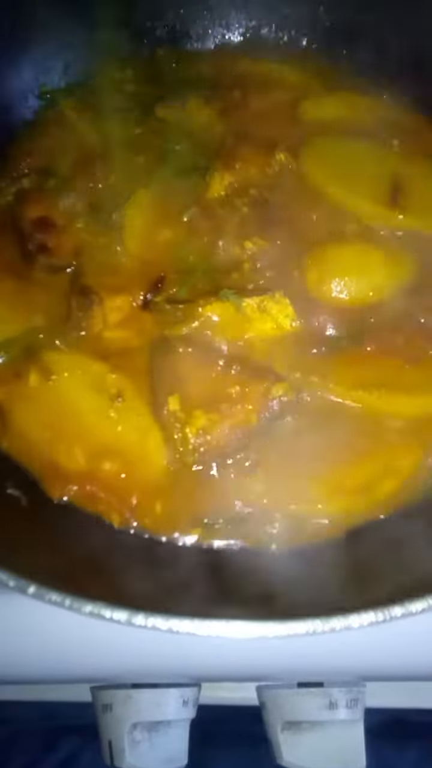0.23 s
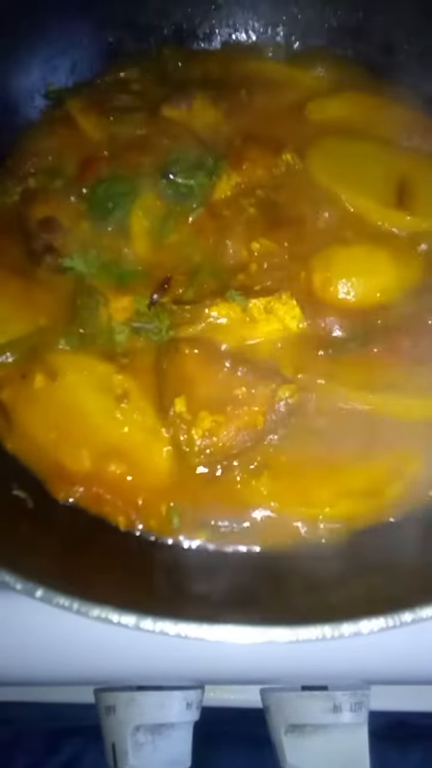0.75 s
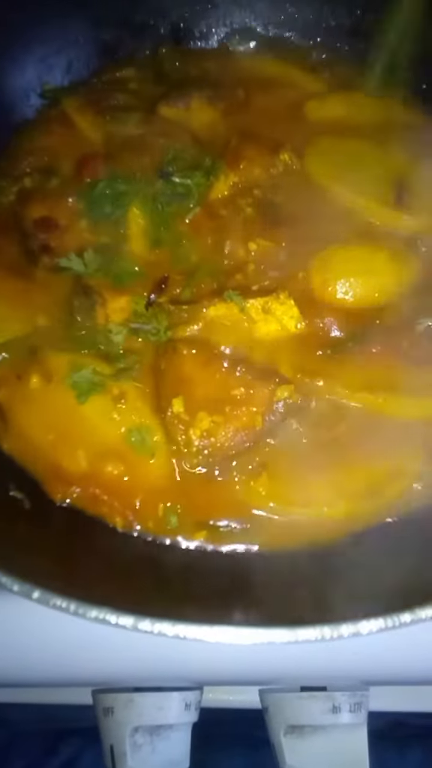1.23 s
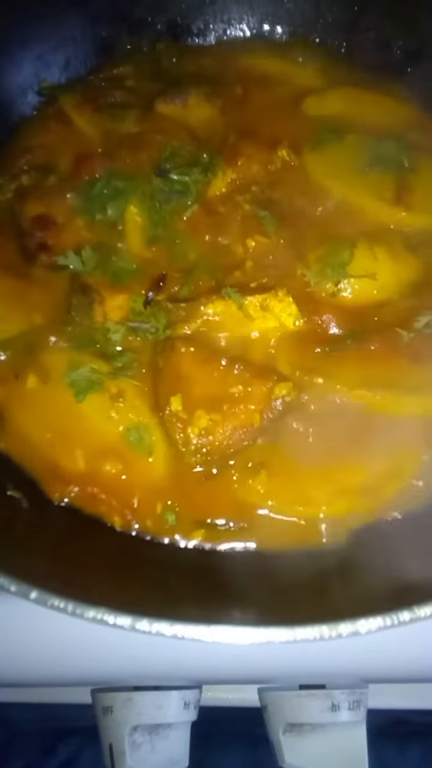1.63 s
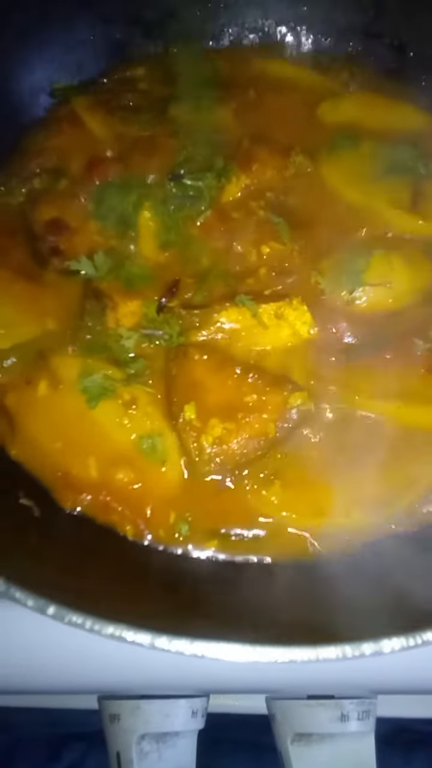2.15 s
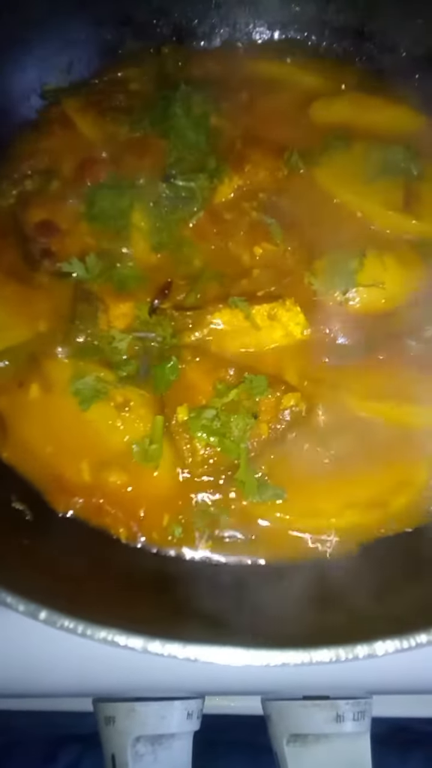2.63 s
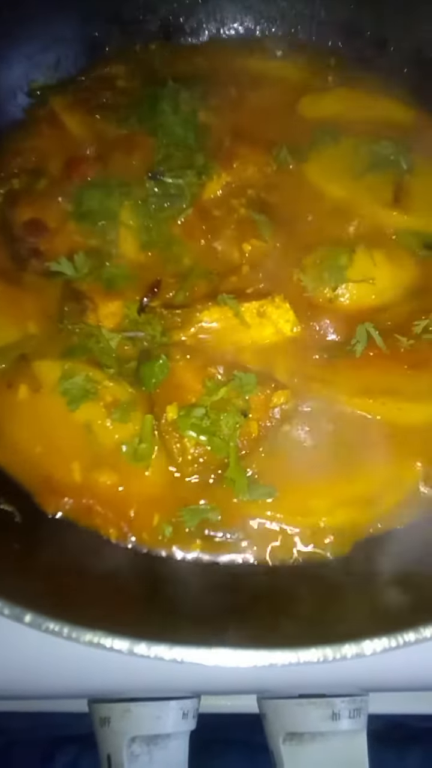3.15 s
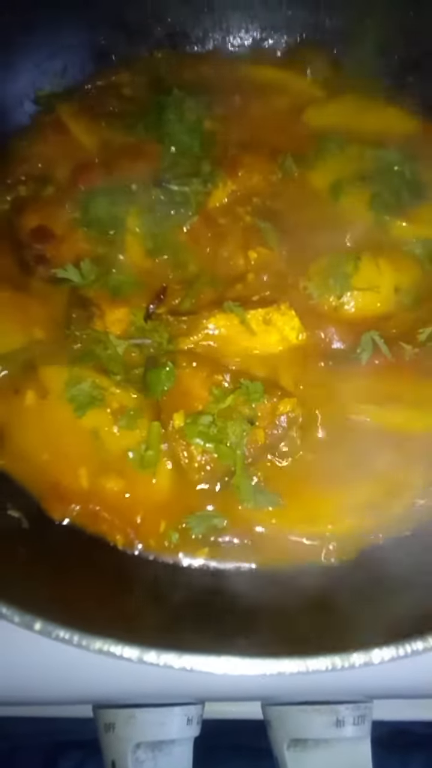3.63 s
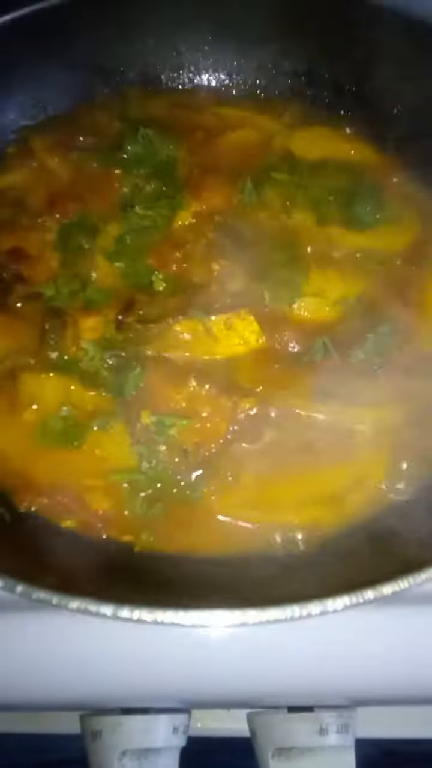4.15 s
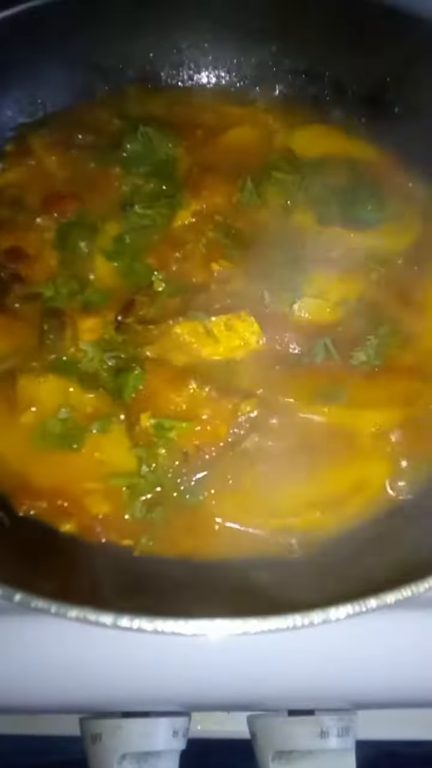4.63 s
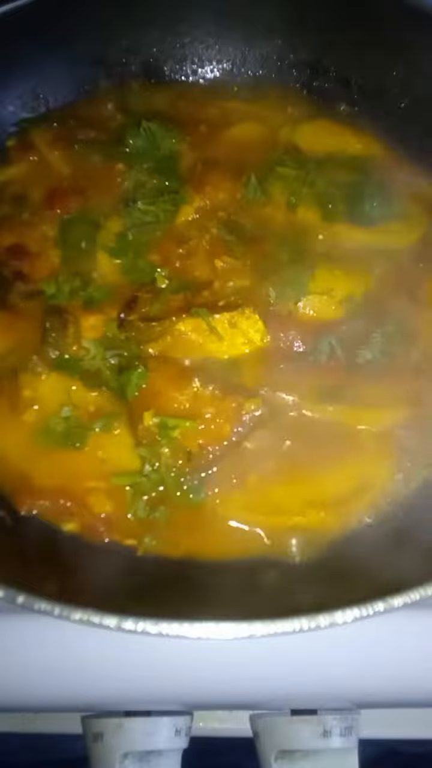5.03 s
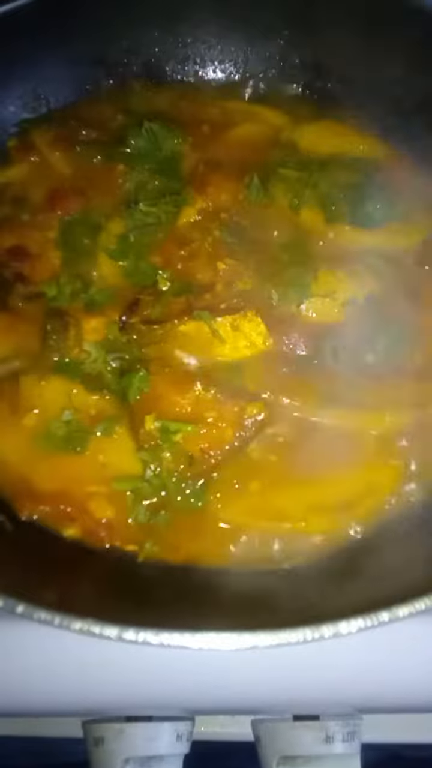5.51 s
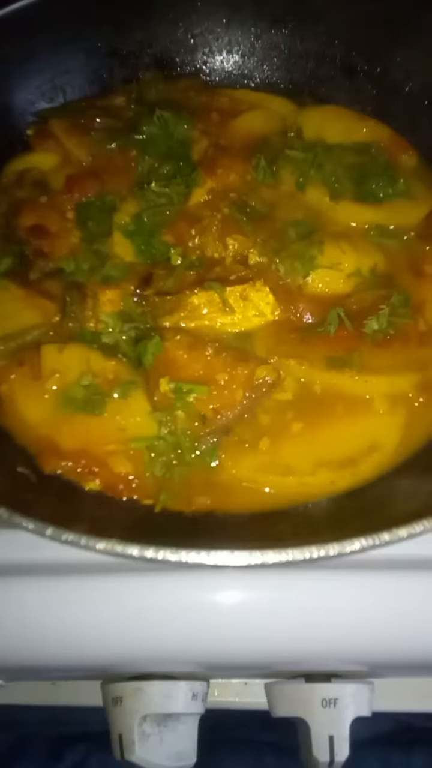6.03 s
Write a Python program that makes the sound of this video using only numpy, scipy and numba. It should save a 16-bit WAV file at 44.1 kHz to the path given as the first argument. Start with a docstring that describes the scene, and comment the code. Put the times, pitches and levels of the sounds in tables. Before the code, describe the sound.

Thick curry bubbles and sputters wetly in a pan up close, with sharp pops and spits, brief knocks and cut-outs, then a quiet kitchen.

```python
"""A thick curry simmers in a wide pan near a hand-held phone, over low rumble, faint kitchen noise and hiss.
From the start, swarms of damped sines make bubbles of four sizes; louder sines with spits of noise make pops.
Steam sputters, noise cracks followed by narrow strings of sines, join in; later fingers knock the phone.
At about 4.1 s the sound cuts out and fades back from a new position, with other resonances; at about 5.8 s,
just after further knocks, it cuts out again and fades back over the quiet kitchen alone."""
import sys
import numpy as np
from scipy import signal
from scipy.fft import rfft, irfft
from scipy.io import wavfile
from scipy.ndimage import uniform_filter1d
from numba import njit

SR = 44100
rng = np.random.default_rng(int(sys.argv[2]) if len(sys.argv) > 2 else 0)


def int16_out(signal):
    """Quantize to a 16-bit WAV file."""
    q = np.round(np.clip(np.atleast_2d(signal).T, -1, 1) * 32767)
    wavfile.write(sys.argv[1], SR, q.astype(np.int16))


def gain_from_decibels(decibels):
    """Convert decibel values to linear amplitude factors."""
    exponent = np.asarray(decibels, float) / 20
    return 10 ** exponent


N = 276930
TIME = np.arange(N) / SR


def level(x, db):
    """Root-mean-square normalisation: scale a signal to an rms level in dB."""
    return x * gain_from_decibels(db) / np.sqrt(np.mean(x ** 2))


def response(points, peaks=()):
    """Transfer magnitude: a curve through (Hz, dB) points times resonance peaks (Hz, width Hz, lift dB)."""
    hz = np.maximum(np.fft.rfftfreq(N, 1 / SR), 1)
    point_hz, point_db = np.transpose(points)
    gain = gain_from_decibels(np.interp(np.log(hz), np.log(point_hz), point_db))
    for centre, width, lift_db in peaks:
        detuning = 2 * (hz - centre) / width
        gain = gain * (1 + (gain_from_decibels(lift_db) - 1) / (1 + detuning ** 2))
    return gain


def causal(x, gain):
    """Minimum-phase filtering: the folded cepstrum lets resonances ring only after their excitation."""
    cepstrum = irfft(np.log(gain), N)
    cepstrum[1:N // 2] *= 2
    cepstrum[N // 2 + 1:] = 0
    return irfft(rfft(x) * np.exp(rfft(cepstrum)), N)


def noise(points):
    """Spectral shaping: steady white noise filtered to a given colour."""
    return irfft(rfft(rng.standard_normal(N)) * response(points), N)


def walk(rate):
    """Slow random modulation: normal levels drawn `rate` times a second, joined by straight ramps."""
    hold = int(SR / rate)
    steps = np.repeat(rng.standard_normal(400), hold)[:N]
    return 1.046 * uniform_filter1d(steps, hold)


def swells(centre, width, change_db):
    """Gaussian modulation: a sum of bell-shaped level changes in dB, each with its full width at 1/e."""
    return sum(db * np.exp(-4 * ((TIME - at) / wide) ** 2)
               for at, wide, db in zip(centre, width, change_db))


def puffs(s, db, t60, rise):
    """Impulse excitation of an envelope: gusts rise with time constant `rise` in s and decay exponentially."""
    trigger = np.zeros(N)
    np.add.at(trigger, (s * SR).astype(int), gain_from_decibels(db))
    age = TIME[:SR // 8]
    return signal.fftconvolve(trigger, (1 - np.exp(-age / rise)) * 1000. ** (-age / t60))[:N]


@njit
def rings(start, hz, t60, size, glide, rise, length):
    """Damped free oscillation: sines swell over the share `rise` of their life, then decay; pitch glides."""
    out = np.zeros(length)
    for k in range(len(start)):
        life = int(t60[k] * SR)
        phase = 0.
        for i in range(min(life, length - start[k])):
            age = i / life
            phase += 2 * np.pi * hz[k] * (1 + glide * age) / SR
            swell = np.sin(np.pi / 2 * min(age / rise, 1.)) ** 2
            decay = 1000. ** -max(age - rise, 0.)
            out[start[k] + i] += size[k] * swell * decay * np.sin(phase)
    return out


def ring_rows(rows, glide, rise):
    """Superposition of damped oscillations, from rows of (start s, Hz, T60 s, amplitude)."""
    s, hz, t60, size = (np.ascontiguousarray(c) for c in np.transpose(rows))
    return rings((s * SR).astype(np.int64), hz, t60, size, glide, rise, N)


# Broad colour under the resonances. Each row: frequency in Hz, gain in dB.
PAN_COLOUR = [(150, -8.5), (300, -1), (600, 3.5), (1000, -3), (1500, -11), (2200, -7.5), (3500, -15.5),
              (5500, -25.5), (6800, -29), (8000, -38.5), (10000, -64)]
# Resonances between pan and microphone, one table a position.
# Each row: centre in Hz, width in Hz, lift in dB.
POSITION_RESONANCES = [
    [(530, 95, 11.5), (704, 30, 5.5), (1030, 470, 4.5), (2490, 380, 22.5), (3195, 130, 11),
     (3750, 160, 5.5), (4550, 140, 12), (5380, 220, 3.5), (6580, 100, 7.5)],
    [(525, 65, 12.5), (720, 120, 5.5), (1100, 360, 9.5), (2136, 320, 17), (2640, 88, 7.5),
     (3700, 260, 14.5), (4450, 230, 10.5), (4900, 200, -3), (6450, 400, 0.5)],
]


def heard(x):
    """Resonant transmission: through the modes of the first position, then of the second."""
    move_s = 4.09
    first, second = (causal(x, response(PAN_COLOUR, peaks)) for peaks in POSITION_RESONANCES)
    return np.where(TIME < move_s, first, second)


def walls(x):
    """Diffuse reverberation: a short decaying noise tail from pan wall, hob and tiles."""
    t60_s, tail_db = 0.082, -7
    age = TIME[:SR // 4]
    tail = rng.standard_normal(len(age)) * 1000. ** (-age / t60_s) * (age > .003)
    return x + gain_from_decibels(tail_db) * signal.fftconvolve(x, tail / np.linalg.norm(tail))[:N]


# Kitchen background colour. Each row: frequency in Hz, relative density in dB per Hz.
KITCHEN_COLOUR = [(30, -25), (80, -9.5), (125, -7.5), (230, -12), (850, -15), (1400, -23.5), (2500, -29),
                  (6500, -32.5), (8000, -53.5), (12000, -73.5)]


def kitchen():
    """Stationary background noise: a steady, mostly low spectrum."""
    return level(noise(KITCHEN_COLOUR), -73.5)


# Microphone hiss colour. Each row: frequency in Hz, relative density in dB per Hz.
HISS_COLOUR = [(3000, -9.5), (8000, -4), (13600, -9), (14700, 1), (15700, 0), (15900, -39)]


def hiss():
    """Microphone self-noise: a steady high-frequency spectrum."""
    return level(noise(HISS_COLOUR), -92.5)


# Burner and hand rumble colour. Each row: frequency in Hz, relative density in dB per Hz.
RUMBLE_COLOUR = [(20, -8), (45, -2.5), (100, -0.5), (170, -3), (280, -1), (400, -27), (700, -77)]
# The hand shifts on the phone. Each row: centre in seconds, full width in seconds, rumble lift in dB.
HAND_SHIFTS = [(.5, 0.97, 8), (1.126, .15, 5.5), (1.383, .1, 3.5), (1.541, 0.087, 16), (1.7, 0.073, 12),
               (1.893, 0.041, 1), (2.123, .08, 5.5), (2.4, 0.24, 5), (3.55, .07, 3), (3.819, 0.033, 15.5),
               (3.872, 0.045, 16), (3.958, 0.071, 14), (4.4, 0.19, 5), (4.797, .14, 12),
               (5.275, 0.047, 9.5), (5.667, 0.079, 10)]


def rumble():
    """Amplitude-modulated low-frequency noise: burner and hand, swelling as the grip shifts."""
    mean_db, wander_db, wander_per_s = -76.5, 3.5, 9
    db = mean_db + swells(*np.transpose(HAND_SHIFTS)) + wander_db * walk(wander_per_s)
    return level(noise(RUMBLE_COLOUR), 0) * gain_from_decibels(db)


def swarm(low_hz, high_hz, rate, cycles, spread_db, fizz_db):
    """Random bubble resonance: scattered bursts, a few much larger, over the fizz of uncountable ones."""
    when, pitch, big, sign = rng.random((4, 8000))
    keep = np.arange(8000) < rate * N / SR
    hz = low_hz + (high_hz - low_hz) * pitch
    spread = gain_from_decibels(-spread_db * np.log(1 - .98 * big))
    size = keep * np.sign(sign - .5) * spread * np.sqrt(hz / low_hz)
    # the pitch rises as the cavity shrinks
    bursts = ring_rows(np.transpose([when * N / SR, hz, 3 * cycles / hz, size]), glide=0.092, rise=.2)
    fizz = noise([(low_hz / 1.2, -40), (low_hz, 0), (high_hz, 0), (high_hz * 1.15, -40)])
    return level(bursts, 0) + level(fizz, fizz_db)


def blisters():
    """Impulsive modulation: the sauce skin tears at random; for a moment every swarm bursts harder."""
    per_s, mean_db, spread_db = 30, -1, 6
    when, big = rng.random((400, 2))[:int(per_s * N / SR)].T
    gusts = puffs(when * N / SR, mean_db + spread_db * (big - .5), t60=.08, rise=.003)
    return level(1 + gusts, 0)


# Slow strength of the boil. Each row: time in seconds, relative level in dB, treble control in dB.
BOIL_STRENGTH = [(0, -63, -0.5), (.21, -62.5, -5), (.4, -59.5, 1.5), (.92, -66.5, 0.5), (1.2, -59, -2),
                 (1.62, -61, -1), (2.1, -60, -2.5), (2.55, -62.5, 3), (2.92, -60, 0.5), (3.4, -60.5, -3),
                 (3.75, -59.5, -1), (4.03, -62, -10), (4.13, -68, 2), (4.3, -62.5, 2), (4.55, -61.5, 1),
                 (4.95, -62, 5.5), (5.17, -68, 1.5), (5.36, -64.5, 1), (5.75, -61.5, 2.5)]
# Heaves of the sauce, which alter all swarms. Each row: centre in seconds, full width in seconds,
# level change in dB, tilt in dB from one swarm to the next finer.
SAUCE_HEAVES = [(.005, 0.043, 14, -6.5), (0.15, 0.057, 1, 3), (0.303, 0.13, 4.5, 2.5),
                (0.494, 0.049, 4, -0.5), (0.533, 0.067, 2, -3), (0.641, 0.041, 3.5, -4),
                (0.704, 0.24, 8.5, -1.5), (0.877, 0.024, 9, 0.5), (0.987, 0.05, 10.5, -1.5),
                (1.076, 0.083, 9.5, -4), (1.22, 0.069, 5, 0), (1.34, 0.036, -5.5, 3.5),
                (1.499, 0.063, 7, 0), (1.774, 0.065, 7.5, 0.5), (2, .09, 11.5, -1),
                (2.183, 0.15, 5.5, -1.5), (2.291, 0.083, 7.5, 0), (2.442, 0.069, 0, 4),
                (2.594, 0.068, 6.5, 0), (2.661, 0.055, 12.5, -4.5), (2.858, 0.043, 5.5, -1.5),
                (2.99, 0.046, 0.5, 1), (3.172, 0.12, 2.5, 0), (3.307, 0.041, 4.5, -2),
                (3.543, 0.029, 12.5, -1.5), (3.612, 0.087, 6, 0), (3.798, 0.088, 0.5, 2.5),
                (3.931, 0.065, 8, 3.5), (4.016, 0.072, 7, 3), (4.401, 0.095, 7.5, -1),
                (4.636, 0.097, 7, -3), (4.763, 0.067, 9, -2.5), (4.831, 0.037, 6.5, -2),
                (5.09, 0.13, 4, 0.5), (5.28, 0.13, 8.5, -1), (5.458, 0.029, -5.5, 4.5)]
# Bubble swarms, coarse to fine. Each row: lowest starting pitch in Hz, highest in Hz, bursts per second,
# cycles per 20 dB of decay, size spread in dB, fizz against the bursts in dB.
BUBBLE_SWARMS = [(253.8, 778, 340, 4.68, 2.0, -5), (776, 1722, 320, 8.0, 2.5, -6),
                 (1578, 3430, 900, 11.7, 3, -12.5), (3424, 7200, 930, 14, 3, -10)]
# Level of each swarm against the boil, in dB.
SWARM_LEVELS = [0, -7.5, -4, -13]
# Share of the treble control that each swarm follows, without unit.
SWARM_TREBLE_SHARES = [0, .4, 1, 1.1]


def boil():
    """Collective bubble noise: swarms share the boil and its heaves; each also wanders alone."""
    wander_db, wander_per_s = 2.5, 14
    s, boil_db, treble_db = np.transpose(BOIL_STRENGTH)
    centre, width, change_db, tilt_db = np.transpose(SAUCE_HEAVES)
    swarms = 0
    for k, row in enumerate(BUBBLE_SWARMS):
        db = np.interp(TIME, s, boil_db + SWARM_LEVELS[k] + SWARM_TREBLE_SHARES[k] * treble_db)
        db = db + swells(centre, width, change_db + k * tilt_db)
        db = db + wander_db * walk(wander_per_s)
        swarms = swarms + level(heard(swarm(*row)), 0) * gain_from_decibels(db)
    return swarms * blisters()


# Loud single bursts. Each row: time of the spit in seconds, relative ring level in dB,
# starting pitch in Hz, nominal T60 in seconds.
LOUD_POPS = [(.002, -39, 2470, 0.014), (0.1285, -44, 3900, 0.015), (.129, -44, 534, 0.044),
             (0.2906, -42, 2610, 0.011), (.344, -45, 545, 0.019), (.38, -40.5, 525, 0.037),
             (.465, -43.5, 830, 0.0084), (.4868, -43, 2490, 0.012), (0.49, -46.5, 3850, 0.022),
             (.5172, -42, 2320, .012), (0.537, -41, 2430, 0.0093), (0.595, -51.5, 522, 0.024),
             (.681, -43, 500, 0.011), (.6968, -44, 2940, 0.014), (0.7095, -38, 2296, 0.01),
             (0.8553, -47.5, 2560, 0.016), (0.9646, -34, 2430, 0.0092), (0.974, -40, 2570, .008),
             (1.0408, -37, 2340, 0.0073), (1.062, -35, 953, 0.014), (1.086, -50.5, 1014, 0.05),
             (1.119, -46, 2420, 0.01), (1.1746, -36, 2680, 0.0039), (1.2045, -37, 2570, 0.0036),
             (1.2444, -39.5, 2550, .0083), (1.3055, -35.5, 2310, 0.011), (1.3429, -36.5, 2800, 0.0028),
             (1.375, -42, 2580, 0.0085), (1.4437, -39.5, 2450, 0.0079), (1.5267, -40, 2210, 0.013),
             (1.658, -43, 523, 0.024), (1.6699, -43, 2640, 0.013), (1.728, -44.5, 2540, 0.012),
             (1.789, -39.5, 744, 0.021), (1.789, -38.5, 2160, 0.011), (1.916, -33, 2490, 0.011),
             (1.935, -46.5, 543, .053), (1.984, -45, 556, 0.031), (1.986, -44, 1160, .015),
             (2.1592, -47.5, 3110, 0.0047), (2.177, -45, 688, 0.033), (2.1789, -35, 2494, 0.014),
             (2.2116, -43.5, 3140, 0.013), (2.2497, -40, 3860, 0.0092), (2.2804, -34.5, 2490, 0.0093),
             (2.345, -44.5, 465, 0.032), (2.3461, -45, 2220, 0.012), (2.4199, -56, 2400, .012),
             (2.6838, -42, 2550, 0.019), (2.7, -50, 3900, 0.013), (2.717, -44, 3230, .01),
             (2.816, -47.5, 713, .035), (2.8157, -46, 2650, 0.013), (2.834, -48, 2750, 0.0049),
             (2.8475, -38.5, 2490, 0.0086), (2.968, -44, 2440, .0085), (3.1823, -38, 2580, 0.006),
             (3.194, -47, 680, 0.023), (3.196, -40.5, 2500, 0.0067), (3.258, -50, 3120, 0.014),
             (3.322, -47.5, 2460, 0.02), (3.435, -44.5, 2170, 0.01), (3.4671, -32.5, 2550, 0.004),
             (3.5289, -43.5, 2640, 0.012), (3.532, -41, 525, 0.01), (3.5997, -38, 2470, 0.012),
             (3.846, -43.5, 904, .025), (3.9257, -45, 2440, 0.016), (4.0497, -38.5, 2440, 0.0092),
             (4.4026, -43, 2154, .014), (4.4582, -42, 1990, 0.0073), (4.4789, -42.5, 2120, 0.013),
             (4.493, -46.5, 530, 0.017), (4.518, -46.5, 2300, .0096), (4.576, -52, 532, 0.12),
             (4.6327, -43.5, 2050, 0.011), (4.8317, -46, 2640, 0.0078), (4.8546, -44, 2040, .015),
             (5.025, -51, 510, 0.093), (5.1052, -46.5, 2240, 0.0083), (5.262, -46, 527, 0.061),
             (5.298, -56, 540, .047)]


def pops():
    """Cavity resonance with impulsive excitation: a ring, and a spit of droplets that excites all modes."""
    spit_at_1khz_db, per_octave_db, scatter_db = -21.5, 5, 3.5  # spit against the ring
    s, ring_db, hz, t60 = np.transpose(LOUD_POPS)
    spit_db = spit_at_1khz_db + per_octave_db * np.log2(hz / 1000)
    spit_db = spit_db + scatter_db * rng.standard_normal(len(s))
    rows = np.transpose([s - .001, hz, np.clip(t60, .003, .08), gain_from_decibels(ring_db)])
    ring = ring_rows(rows, glide=0.074, rise=0.2)
    spit = puffs(s, ring_db + spit_db, t60=0.1, rise=0.00062) * rng.standard_normal(N)
    return ring + heard(spit)


# Sputters of steam from a small vent. Each row: start in seconds, relative level in dB,
# central pitch in Hz, length in seconds, crack against that level in dB.
STEAM_SPUTTERS = [(0.126, -37.5, 4400, 0.047, -5.5), (.24, -62, 6000, .02, 8),
                  (0.284, -62, 7900, 0.034, -14), (0.288, -52.5, 6500, .015, 12),
                  (0.3163, -34, 4650, 0.019, -5.5), (0.396, -43.5, 4330, 0.042, 3),
                  (0.429, -52, 3870, .02, 8), (0.4596, -36, 6370, .025, -11),
                  (0.634, -51.5, 5440, .04, 6.5), (0.698, -59, 4540, .03, 6.5),
                  (0.7417, -43.5, 6370, 0.026, -1), (1.03, -56.5, 6800, .03, 7),
                  (1.051, -58, 5000, 0.028, 7), (1.1747, -54, 4430, .047, 13), (1.2244, -40, 4630, .04, -2),
                  (1.297, -61, 6500, 0.015, 2.5), (1.33, -45, 4000, .07, -6), (1.412, -41, 4330, 0.034, -2),
                  (1.527, -52, 4400, .04, 2), (1.609, -52.5, 4400, .04, 5), (1.956, -53.5, 3820, .05, 13),
                  (1.991, -56, 9100, 0.04, -12), (2.018, -47, 4440, .12, 12.5),
                  (2.117, -41, 3700, 0.05, 2.5), (2.2474, -39, 5430, 0.019, 4),
                  (2.3176, -38.5, 6380, 0.099, -9), (2.318, -47, 5300, .03, -5),
                  (2.355, -31, 5150, .02, 2.5), (2.405, -42.5, 4550, .02, -4),
                  (2.544, -46.5, 5800, 0.036, -16), (2.686, -49, 4500, 0.022, 0),
                  (2.821, -49.5, 4300, .013, 8), (2.844, -45.5, 5900, 0.039, 12),
                  (2.989, -42.5, 4500, .044, 1), (3.0859, -47.5, 4300, 0.047, 4),
                  (3.146, -45, 4400, .04, -2), (3.307, -44, 4620, 0.026, 5.5),
                  (3.421, -48.5, 4470, 0.034, 3), (4.637, -54, 3580, 0.065, -10),
                  (4.749, -45, 3200, .037, 3), (4.988, -50, 3560, 0.039, -14),
                  (5.0641, -41.5, 4390, 0.076, 6), (5.1574, -45, 3600, 0.036, -13),
                  (5.3634, -44.5, 4270, 0.033, -10), (5.4604, -46.5, 3800, 0.021, 1)]
# Colour of the crack. Each row: frequency in Hz, gain in dB.
CRACK_COLOUR = [(1500, -37), (2500, 10), (5000, 7), (7000, -9.5), (8500, -30), (15000, -32), (16000, -56.5)]


def sputters():
    """Narrow-band pulse train: the skin cracks; tiny bubbles near one pitch fade as the vent closes."""
    s, sputter_db, hz, length, crack_db = np.transpose(STEAM_SPUTTERS)[:, :, None]
    shape = (len(s), 24)  # bubbles in each string
    late, detune = rng.random(shape), rng.standard_normal(shape)
    pitch = hz * (1 + 0.031 * detune)
    start = s + late * np.clip(length, .003, .12)
    columns = [start, pitch, 40 / pitch, gain_from_decibels(sputter_db - 12.5 - 26.4 * late)]
    whistle = ring_rows(np.transpose([c.ravel() for c in columns]), glide=0.013, rise=0.21)
    gusts = puffs(s[:, 0], (sputter_db + crack_db)[:, 0], t60=0.0061, rise=0.0009)
    return whistle + causal(gusts * rng.standard_normal(N), response(CRACK_COLOUR))


# Knocks on the phone. Each row: contact in seconds, relative levels of thump, shell and tick in dB,
# softness of contact from 0 to 1.
PHONE_KNOCKS = [(3.9086, -13, -15, -25.5, 0.1), (4.049, -53, -56, -42, 0.02), (5.6894, -75, -41, -54, .08),
                (5.6912, -37, -31, -77, 0.27), (5.752, -59.5, -32.5, -71, 0.08)]
# Swing of the whole phone: starting pitch in Hz, nominal T60 in seconds.
THUMP_MODE = (119, 0.032)
# Shell modes. Each row: starting pitch in Hz, relative level in dB, nominal T60 in seconds.
SHELL_MODES = [(240, -21, 0.0082), (664, -2.5, 0.015), (871, -1.5, 0.0099), (1040, -5.5, 0.011),
               (1444, -16.5, 0.012), (2180, -25.5, 0.016)]
# Colour of the tick. Each row: frequency in Hz, gain in dB.
TICK_COLOUR = [(1500, -36.5), (2450, 0.5), (4000, -22.5), (6000, 9.5), (9000, -16), (12500, -13),
               (15000, -1.5), (16000, -24)]


def knocks():
    """Modal response to impact: the shell rings at once with a tick; the whole phone swings with its own lag."""
    lag_s, soft_lag_s = 0.0018, .025  # the swing comes later after a softer contact
    out = 0
    for s, thump_db, shell_db, _, soft in PHONE_KNOCKS:
        swing_s = s + lag_s + soft_lag_s * soft - .25 / THUMP_MODE[0]  # a quarter period early
        out = out + ring_rows([(swing_s, *THUMP_MODE, -gain_from_decibels(thump_db))], glide=-.05, rise=.12)
        modes = [(s, hz, t60, gain_from_decibels(shell_db + db)) for hz, db, t60 in SHELL_MODES]
        out = out + ring_rows(modes, glide=-0.091, rise=np.clip(soft, .01, .5))
    s, tick_db = np.transpose(PHONE_KNOCKS)[[0, 3]]
    ticks = puffs(s, tick_db, t60=0.0062, rise=.00015) * rng.standard_normal(N)
    return out + causal(ticks, response(TICK_COLOUR))


# Cuts in the sound. Each row: cut in seconds, time from cut to fade in seconds, fade length in seconds.
SOUND_CUTS = [(4.054, .038, .2), (5.7545, .133, .36)]


def cuts():
    """Gain modulation: an overall gain drops at each cut and climbs back along a slightly bent ramp."""
    gain_db, drop_s, fade_bend = 2, .002, 1.27  # a bend of 1 is straight
    gain = np.full(N, gain_from_decibels(gain_db))
    for s, silence, fade in SOUND_CUTS:
        since = TIME - s
        ramp = np.clip((since - silence) / fade, 0, 1) ** fade_bend
        drop = np.clip(1 - since / drop_s, 0, 1)
        gain = gain * np.maximum(ramp, drop)
    return gain


def scene():
    """Superposition of sources: the pan sounds until 5.8 s, the kitchen throughout, with the knocks."""
    pan = walls(boil() + rumble() + pops() + sputters())
    return (pan * (TIME < 5.8) + kitchen() + knocks())[None]


def roll_off(x):
    """The treble ends steeply here."""
    return signal.sosfilt(signal.butter(12, 16740, fs=SR, output="sos"), x)


def record(dry):
    """High-pass transduction: the microphone drops the deepest bass and adds hiss; then come the cuts."""
    high_pass = signal.butter(3, 75.6, "high", fs=SR, output="sos")
    picked = signal.sosfilt(high_pass, dry)
    mix = (picked + hiss()) * cuts()
    return roll_off(mix)


dry = scene()
out = record(dry)
int16_out(out)
```